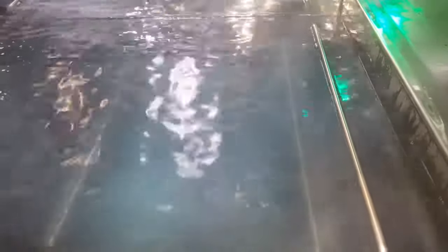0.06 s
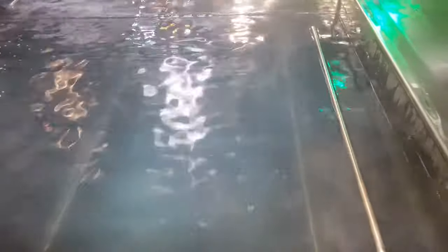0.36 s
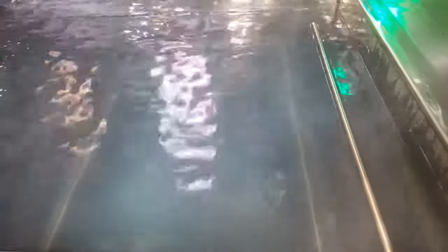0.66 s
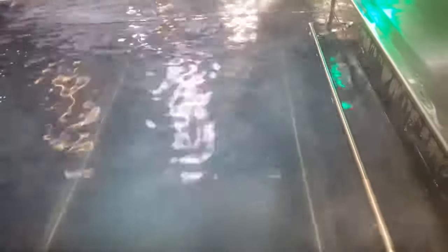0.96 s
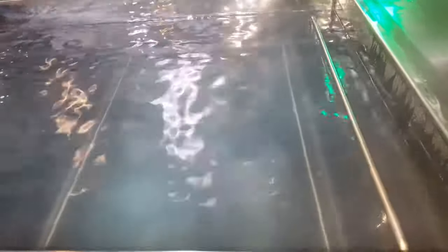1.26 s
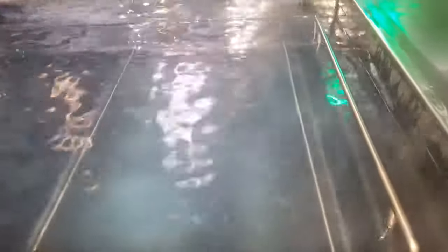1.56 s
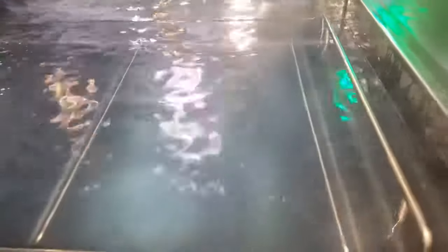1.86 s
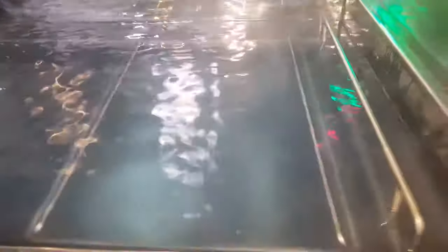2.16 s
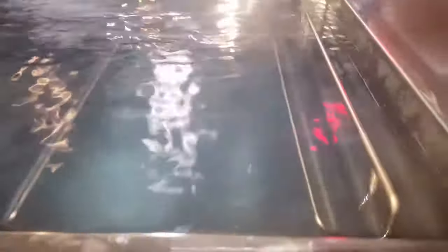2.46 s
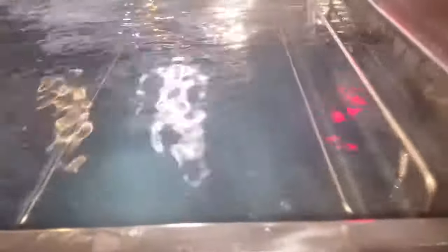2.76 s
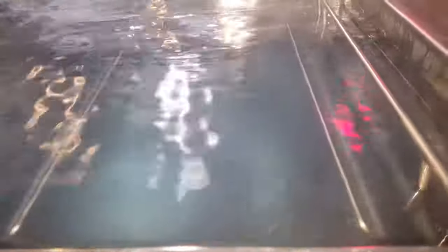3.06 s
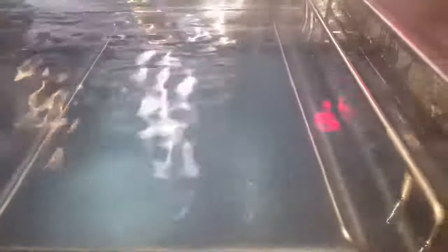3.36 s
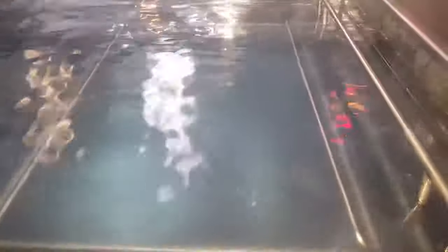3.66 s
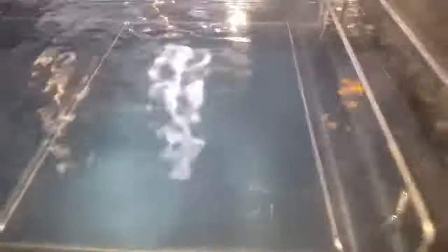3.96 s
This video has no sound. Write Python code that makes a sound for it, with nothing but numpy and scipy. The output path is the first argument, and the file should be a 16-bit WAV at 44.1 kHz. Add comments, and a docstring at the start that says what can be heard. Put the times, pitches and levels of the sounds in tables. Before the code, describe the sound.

An ultrasonic cleaning tank gives a loud, steady buzzing roar with a high fizz, heard close. It cuts off abruptly, the water sloshes and a relay clacks. Quiet workshop fans hum until a pump starts with a hiss and thump.

```python
"""A buzzing roar comes first: bubble clouds collapse in an ultrasonic cleaning tank, in step with the
drive's frequency sweep, under a fizz of tiny bubbles that pulses with the mains. The drive cuts out,
the bath sloshes, a relay clacks, and automatic gain control slowly lifts the workshop's fans and hum.
Near the end a pump kicks in with a spit of hiss and a low thump through the tank wall."""
import sys
import numpy as np
from scipy import signal
from scipy.fft import rfft, irfft, next_fast_len
from scipy.io import wavfile
from scipy.ndimage import uniform_filter1d, minimum_filter1d, map_coordinates

SR = 44100
rng = np.random.default_rng(int(sys.argv[2]) if len(sys.argv) > 2 else 0)


def store_pcm(level_fs):
    """Save levels as 16-bit WAV."""
    pcm = np.round(np.clip(level_fs, -1, 1) * 32767).astype(np.int16)
    wavfile.write(sys.argv[1], SR, np.atleast_2d(pcm).T)


N = 176400
SWEEP_HZ, MAINS_HZ = 62.55, 120  # the drive's sweep rate; twice the line frequency
STOP_S, RELAY_S, PUMP_S = 2.22, 2.388, 3.753


# Spectrum of the collapses: (frequency [Hz], relative density [dB])
ROAR_SPECTRUM = [(18, -67), (30, -51), (85, -20), (114, -16), (153, -14.5), (243, -12), (281, -10.5),
                 (367, -5), (404, -4), (491, -1.5), (528, -2), (970, -3.5), (1740, -6.5), (4710, -23),
                 (10000, -35.5), (13000, -43), (22000, -120)]
# Left-right likeness of the tank: (frequency [Hz], coherence [0-1])
TANK_COHERENCE = [(60, 0.54), (125, 0.42), (250, 0.16), (500, 0.01), (10000, 0.01)]
# Brief swells in the upper range of the roar: (time [s], half length [s], lift [dB])
UPPER_SURGES = [(.9, .02, 3), (1.112, 0.054, 2.5), (1.7, 0.029, 3.5)]

def roar(mains):
    """Cavitation: collapsing bubble clouds emit pressure pulses; the upper range swells now and then."""
    cloud = collapses(per_s=12000, size_db=2) * amp(0.76 * mains + 0.14 * wobble(25.7))
    pulses = filtered(cloud, lambda hz: sweep_comb(hz) * wall_dispersion(hz))
    sound = boiling(spread(pulses, ROAR_SPECTRUM, TANK_COHERENCE))
    upper = filtered(sound, lambda hz: hz ** 4 / (hz ** 4 + 2050 ** 4))
    lift_db = sum(db * np.exp(-((clock() - s) / half) ** 2) for s, half, db in UPPER_SURGES)
    surge_db = 0.7 * wobble(16.1) + 0.69 * treble_db() + lift_db
    return amp(-15.5) * (sound + upper * (amp(surge_db) - 1))


# Share returning one sweep later: (frequency [Hz], feedback [ratio])
FULL_SWEEP_RETURN = [(100, 0.47), (400, 0.33), (1000, 0.27), (1700, 0.39), (2500, 0.14), (4000, 0.037)]
# Share returning half a sweep later: (frequency [Hz], feedback [ratio])
HALF_SWEEP_RETURN = [(120, 0.22), (450, 0.14), (900, 0.056), (2000, .01)]

def sweep_comb(hz):
    """Comb filtering: collapses that recur with the sweep reinforce harmonics of its rate."""
    half_delay = np.exp(-1j * np.pi * hz / SWEEP_HZ)
    full = np.clip(along(FULL_SWEEP_RETURN, hz), 0, .6)
    half = np.clip(along(HALF_SWEEP_RETURN, hz), 0, .35)
    return np.sqrt(1 - full ** 2 - half ** 2) / (1 - full * half_delay ** 2 - half * half_delay)


def wall_dispersion(hz):
    """Dispersion: low bending waves travel more slowly in steel, smearing each collapse."""
    delay_at_1khz_s = .0014
    return np.exp(-4j * np.pi * delay_at_1khz_s * np.sqrt(1000 * hz))


# Swells of the clouds: (frequency [Hz], rms depth [dB])
SWELL_DEPTH = [(150, .5), (450, 1.64), (1200, 1.67), (3000, 1.5), (6000, 1.5)]

def boiling(x):
    """Random modulation: bubble clouds of each size swell and fade in their own band."""
    hz, _, bands = signal.stft(x, SR, nperseg=1024)
    swells = rng.standard_normal(bands.shape[1:])
    swells = uniform_filter1d(swells, size=4, axis=0)
    swells = uniform_filter1d(swells, size=4, axis=1)
    gain = amp(along(SWELL_DEPTH, hz)[:, None] * unit(swells))
    return unit(signal.istft(bands * gain, SR, nperseg=1024)[1][:, :N])


# Spectrum of the tiny bubbles: (frequency [Hz], relative density [dB])
FIZZ_SPECTRUM = [(2500, -17), (4600, -10), (5200, -3.5), (8000, -4.5), (10200, -7), (11500, -2.5),
                 (13000, 1), (15800, 0.5)]

def fizz(mains):
    """Modulated shot noise: tiny bubbles crackle, swelling each mains half-cycle and twice a sweep."""
    passes = np.sin(4 * np.pi * SWEEP_HZ * clock())
    flurries = unit(filtered(wobble(1800), flurry_comb))
    swell_db = 2 * mains + 1.5 * passes + 2.5 * flurries
    spray = collapses(per_s=22000, size_db=3.5) * amp(swell_db)
    hiss = unit(filtered(spray, lambda hz: amp(along(FIZZ_SPECTRUM, hz))))
    return hiss * amp(-27.5 + treble_db() + 0.59 * wobble(30.0))


def flurry_comb(hz):
    """Delayed feedback: the pattern of flurries repeats with the sweep and slowly changes."""
    half_delay = np.exp(-1j * np.pi * hz / SWEEP_HZ)
    return 1 / (1 - .6 * half_delay ** 2 - .2 * half_delay)


# The treble about its mean: (time [s], level [dB])
TREBLE_CONTOUR = [(0.0, 1), (0.05, -1.5), (0.13, 0.5), (0.63, -1.5), (0.68, -3.8), (0.72, 0.5), (0.92, -2),
                  (0.94, 2), (1.02, -0.5), (1.41, 0.3), (1.49, -1), (1.52, 1), (2.06, -0.5), (2.2, 1.2)]

def treble_db():
    """Common modulation: the fizz and the top of the roar rise and fall together."""
    return np.interp(clock(), *np.transpose(TREBLE_CONTOUR))


# Single large bubbles: (time [s], frequency [Hz], level before the tank's gain [dB])
BUBBLE_NOTES = [(.605, 440, -17.5), (.83, 256, -33), (.975, 794, -17), (1.04, 437, -22), (1.93, 809, -16.5)]

def big_bubbles():
    """Bubble resonance: a few large bubbles ring briefly as damped oscillators."""
    return sum(amp(db) * burst(s, attack=0.01, t60=0.26) * tone(hz, waver=1.0)
               for s, hz, db in BUBBLE_NOTES)


# The tank's lean: (frequency [Hz], left minus right [dB])
TANK_LEAN = [(100, -1), (1500, 0.1), (4700, 0.6), (5100, 4), (6500, 4), (8000, -1), (9500, 2),
             (11000, -4.5), (12500, 0), (14000, 5), (15500, -3)]

def tank():
    """Free decay: roar and transformer buzz die as the drive stops; the tiniest bubbles last longer."""
    mains = np.sin(2 * np.pi * MAINS_HZ * clock())
    buzz = amp(-46.5) * tone(MAINS_HZ, waver=0.093) * amp(0.63 * wobble(9.3))
    body = decay(STOP_S, t60=0.04) * (roar(mains) + big_bubbles() + buzz)
    hiss = decay(STOP_S, t60=0.15) * fizz(mains)
    return amp(16) * panned(body + hiss, TANK_LEAN)


# Modes of the steel walls: (frequency [Hz], bandwidth [Hz], gain [dB])
WALL_MODES = [(462, 6, -18), (504, 6, -19), (713, 2.5, -7), (860, 3.6, -17), (1017, 9, -3),
              (1330, 3.6, -24), (1730, 4.4, -21)]

def walls(bath):
    """Forced vibration: the bath drives the tank's walls at their resonances."""
    return resonate(bath, WALL_MODES)


# Snap of the contacts: (frequency [Hz], relative density [dB])
SNAP_SPECTRUM = [(1000, -20), (6500, 0), (9000, 0), (15000, -7)]
# Modes of the housing: (frequency [Hz], bandwidth [Hz], relative level [dB])
HOUSING_MODES = [(800, 62, 6), (1210, 70, 2), (1870, 430, -1), (2460, 350, 2), (3031, 360, -2),
                 (3811, 500, -6), (4900, 250, -5), (5930, 350, -10)]
# Modes of the frame: (frequency [Hz], bandwidth [Hz], relative level [dB])
FRAME_MODES = [(1696, 15, 4), (1857, 14, 8), (2410, 16, 0), (5040, 40, -7), (5792, 32, -8)]

def relay():
    """Impact excitation: a clack across the room, blurred by echoes; the steel frame rings on."""
    snap = amp(-15) * spread(noise(), SNAP_SPECTRUM, TANK_COHERENCE)
    clack = burst(RELAY_S, attack=0.02, t60=0.29) * (ringing(HOUSING_MODES) + snap)
    frame = burst(RELAY_S, attack=0.02, t60=0.52) * ringing(FRAME_MODES)
    return amp(-20.5) * clack + amp(-27) * frame


# Spit of hiss: (frequency [Hz], relative density [dB])
SPIT_SPECTRUM = [(40, -25), (300, 5), (800, 4), (2000, 5), (4500, -4), (8000, -8.5), (10200, -11),
                 (14000, -14), (16000, -17)]
# Modes of the pipe: (frequency [Hz], bandwidth [Hz], relative level [dB])
PIPE_MODES = [(4260, 77, 0), (5130, 91, 0), (7400, 130, -4), (9770, 57, -4), (10200, 120, -4),
              (12700, 70, -9)]
# The wall's answer to the kick: (frequency [Hz], level [dB], t60 [s], delay [s])
THUMP_MODES = [(216, -20.5, 0.097, .012), (121.3, -26, 0.26, 0.026), (240, -31.5, 0.11, 0.062)]
# Hum of the running pump: (frequency [Hz], level [dB])
PUMP_TONES = [(104, -38), (200, -48)]
# Moving water: (frequency [Hz], relative density [dB])
CHURN_SPECTRUM = [(30, -24), (80, 7), (200, 5), (330, -4), (700, -30), (2000, -60)]

def pump():
    """Transient and steady state: a spit rings the pipe, the wall thumps, then the pump hums and churns."""
    hiss = spread(noise(), SPIT_SPECTRUM, SHOP_COHERENCE)
    spit = amp(-18.5) * burst(PUMP_S, attack=0.026, t60=0.17) * hiss
    pipe = amp(-40) * burst(PUMP_S, attack=0.026, t60=.38) * ringing(PIPE_MODES)
    thump = sum(amp(db) * burst(PUMP_S + delay, attack=.006, t60=t60) * tone(hz, waver=0.46)
                for hz, db, t60, delay in THUMP_MODES)
    running = np.clip((clock() - PUMP_S) / 0.19, 0, 1)
    hum = sum(amp(db) * tone(hz, waver=0.65) for hz, db in PUMP_TONES)
    gulp = amp(-25.5) * burst(PUMP_S + 0.033, attack=0.011, t60=0.28)  # the water lurches
    water = (gulp + amp(-42.5) * running) * spread(noise(), CHURN_SPECTRUM, SHOP_COHERENCE)
    return spit + pipe + thump + running * hum + water


# Resonances of the slosh: (frequency [Hz], bandwidth [Hz], relative level [dB])
SLOSH_MODES = [(250, 58, 1.5), (440, 120, -5)]
# Soft plops: (time [s], frequency [Hz], level [dB])
PLOP_NOTES = [(2.33, 329, -25), (2.432, 207, -28)]

def settling_bath():
    """Damped oscillation: the bath settles with a low slosh and two plops."""
    slosh = amp(-29.5) * burst(STOP_S, attack=.02, t60=1.6) * ringing(SLOSH_MODES)
    return slosh + sum(amp(db) * burst(s, attack=0.005, t60=0.073) * tone(hz, waver=.3)
                       for s, hz, db in PLOP_NOTES)


# Reverberation time: (frequency [Hz], t60 [s])
ROOM_T60 = [(150, 0.38), (1000, 0.63), (5000, 0.49), (14000, 0.29)]
# Strength of the reverberation: (frequency [Hz], gain [dB])
ROOM_GAIN = [(100, -10.5), (1000, -23.5), (2500, -21.5), (5000, -13.5), (8500, -3.5), (13000, -4)]

def room(x):
    """Reverberation: diffuse reflections decay exponentially, each frequency at its own rate."""
    hz, t, bands = signal.stft(rng.standard_normal((2, SR // 2)), SR, nperseg=256)
    t60 = along(ROOM_T60, hz)[:, None]
    tail = signal.istft(bands * np.exp(-np.log(1000) * t / t60) / np.sqrt(t60), SR, nperseg=256)[1]
    wet = signal.fftconvolve(x, tail / np.linalg.norm(tail[0]), axes=1)[:, :N]
    return filtered(wet, lambda f: amp(along(ROOM_GAIN, f)))


# Fan noise: (frequency [Hz], relative density [dB])
FAN_SPECTRUM = [(18, -44), (30, -30), (64, -12.5), (114, -5.5), (225, -3), (270, -6), (307, -1), (410, -8),
                (673, -5.5), (921, -8), (1360, -7), (2360, -7), (3680, -17.5), (5170, -24), (15500, -41)]
# Left-right likeness of the workshop: (frequency [Hz], coherence [0-1])
SHOP_COHERENCE = [(80, 0.92), (300, 1), (800, 0.39), (3000, 0)]
# Modes of the steel panels: (frequency [Hz], bandwidth [Hz], relative level [dB])
PANEL_MODES = [(223, 12, -6), (318, 30, -6), (676, 14, -4), (1192, 42, 3), (1374, 87, 2), (2310, 180, -6),
               (5000, 450, -18)]
# Lean of fans and panels: (frequency [Hz], left minus right [dB])
SHOP_LEAN = [(100, 0), (900, 1), (1400, 3.5), (2400, 3), (5000, 2), (12000, 0.5)]

def workshop():
    """Broadband excitation: fan noise stirs steel panels into faint ringing, over mains hum."""
    air = amp(-36.5) * spread(noise(), FAN_SPECTRUM, SHOP_COHERENCE) * amp(0.51 * wobble(11))
    panels = amp(-43.5) * ringing(PANEL_MODES)
    return panned(air + panels, SHOP_LEAN) + amp(-52) * tone(MAINS_HZ, waver=0.19)


def amp(db):
    """Decibels to amplitude ratio."""
    return 10 ** (np.asarray(db) / 20)


def unit(x):
    """Normalisation to rms 1."""
    return x / np.sqrt(np.mean(x ** 2) + 1e-20)


def clock():
    """Sample times in seconds."""
    return np.arange(N) / SR


def along(points, hz):
    """Interpolation on a log frequency axis."""
    f, values = np.transpose(points)
    return np.interp(np.log(hz + 1), np.log(f + 1), values)


def wobble(rate):
    """A smooth random curve, rate knots a second."""
    return map_coordinates(rng.standard_normal(int(N * rate / SR) + 4), [np.arange(N) * rate / SR])


def noise():
    """Two uncorrelated white noises."""
    return rng.standard_normal((2, N))


def collapses(per_s, size_db):
    """Shot noise: random clicks of uneven size, a stream for each side."""
    return unit((rng.random((2, N)) < per_s / SR) * noise() * amp(size_db * noise()))


def tone(hz, waver):
    """Phase modulation: a sine of rms 1 wandering by about waver radians."""
    return np.sqrt(2) * np.sin(2 * np.pi * hz * clock() + waver * wobble(10))


def decay(start, t60):
    """Exponential decay: 1 until start, then down 60 dB every t60 seconds."""
    return np.exp(-np.log(1000) * np.maximum(clock() - start, 0) / t60)


def burst(start, attack, t60):
    """Exponential rise and decay, times in seconds."""
    age = np.maximum(clock() - start, 0)
    return (1 - np.exp(-age / attack)) * decay(start, t60)


def filtered(x, response):
    """Linear filtering by a complex frequency response."""
    size = next_fast_len(N + SR // 2)
    return irfft(rfft(x, size) * response(np.fft.rfftfreq(size, 1 / SR)), size)[..., :N]


def resonate(x, modes):
    """Modal summation: x through parallel resonators of alternating sign."""
    return filtered(x, lambda f: sum(
        (-1) ** k * amp(db) * 1j * f * width / (centre ** 2 - f ** 2 + 1j * f * width)
        for k, (centre, width, db) in enumerate(modes)))


def ringing(modes):
    """Noise-driven resonances, stereo at rms 1."""
    return unit(resonate(noise(), modes))


def spread(pair, spectrum, coherence):
    """Partial coherence: two unrelated signals coloured and mixed to stereo at rms 1."""
    def mid_side_gains(hz):
        angle = np.arccos(np.clip(along(coherence, hz), -1, 1)) / 2
        return amp(along(spectrum, hz)) * [np.cos(angle), np.sin(angle)]
    mid, side = filtered(pair, mid_side_gains)
    return unit(np.array([mid + side, mid - side]))


def panned(x, lean):
    """Level difference: each frequency leans to its side."""
    return filtered(x, lambda hz: amp(along(lean, hz) * np.array([[.5], [-.5]])))


def scene():
    """Superposition: the tank with its walls and room, the later sounds and the workshop."""
    bath = tank()
    return bath + walls(bath) + room(bath) + relay() + settling_bath() + workshop() + pump()


def record(dry):
    """Automatic gain control ducks, holds and recovers; peaks are rounded and the band is limited."""
    limit_db, hold_s, release_s = -12.5, 0.59, 0.22
    ceiling, top_hz = .93, 15800
    power = np.abs(uniform_filter1d(np.mean(dry ** 2, axis=0), size=4410))
    needed_db = np.minimum(limit_db - 10 * np.log10(power + 1e-12), 0)
    half_hold = int(hold_s * SR / 2)
    held_db = minimum_filter1d(needed_db, 2 * half_hold + 1, origin=half_hold)
    pole = np.exp(-1 / (release_s * SR))
    eased_db = signal.lfilter([1 - pole], [1, -pole], held_db - held_db[0]) + held_db[0]
    ducked = dry * amp(np.minimum(held_db, eased_db))
    rounded = ducked / (1 + (ducked / ceiling) ** 6) ** (1 / 6)
    return filtered(rounded, lambda hz: 1 / np.sqrt(1 + (hz / top_hz) ** 300))


dry = scene()
out = record(dry)
store_pcm(out)
```